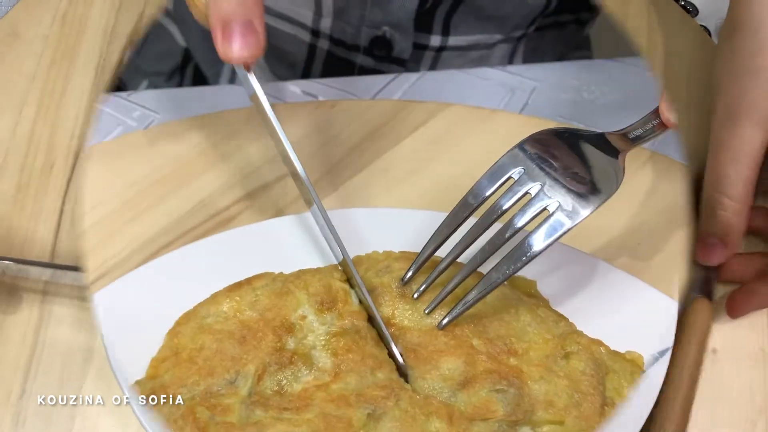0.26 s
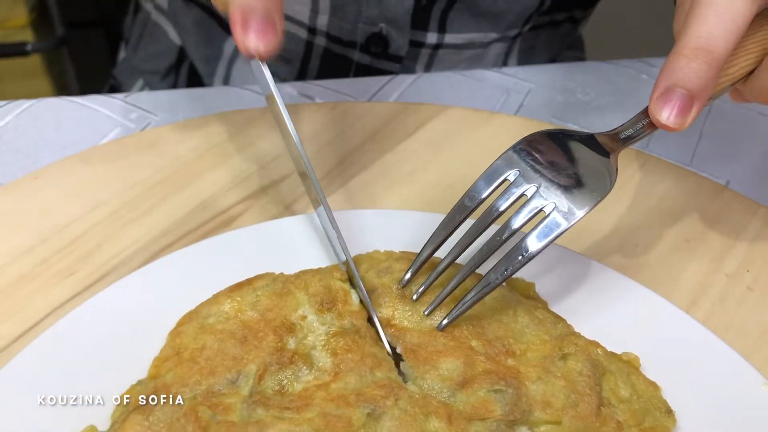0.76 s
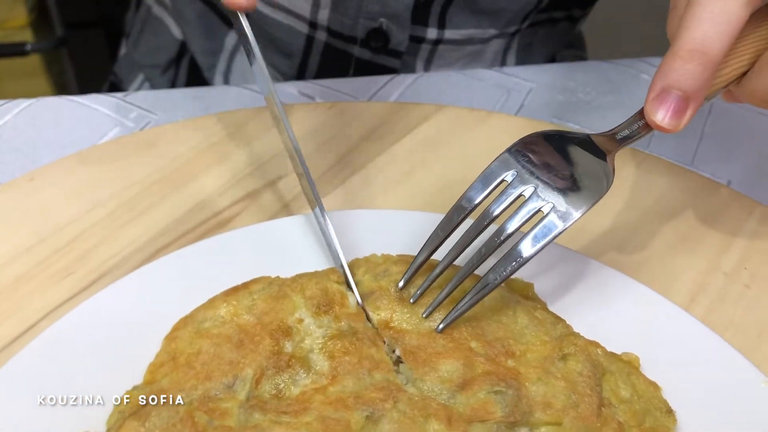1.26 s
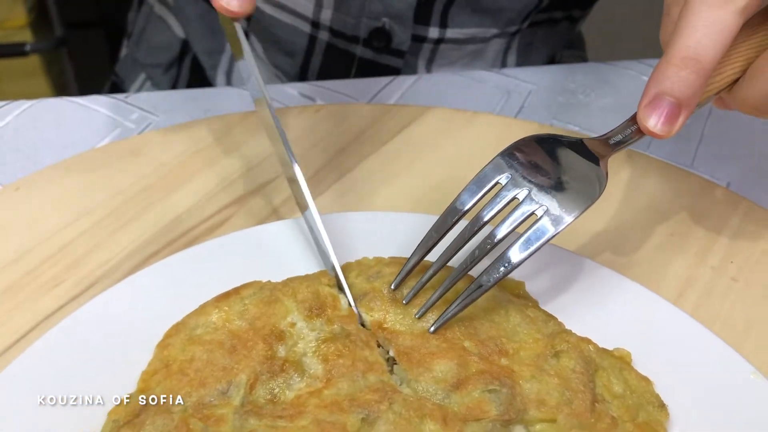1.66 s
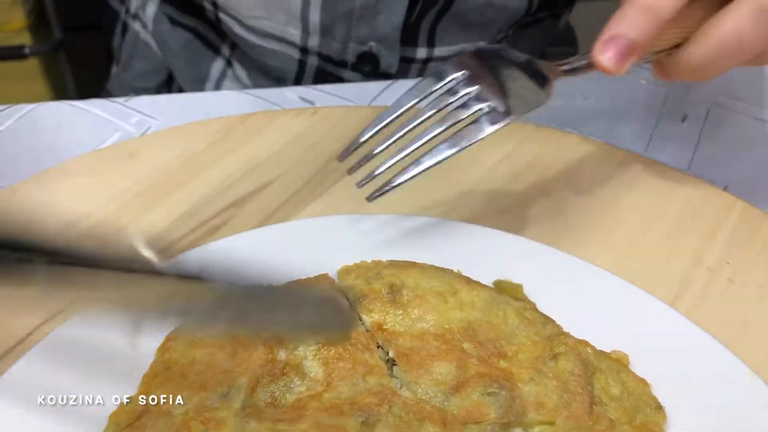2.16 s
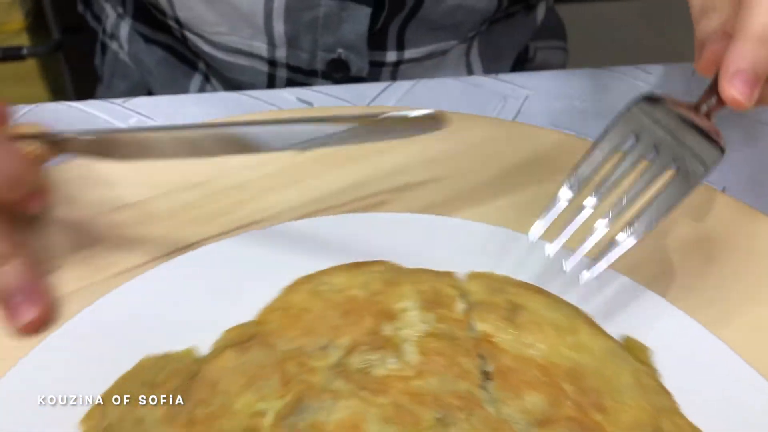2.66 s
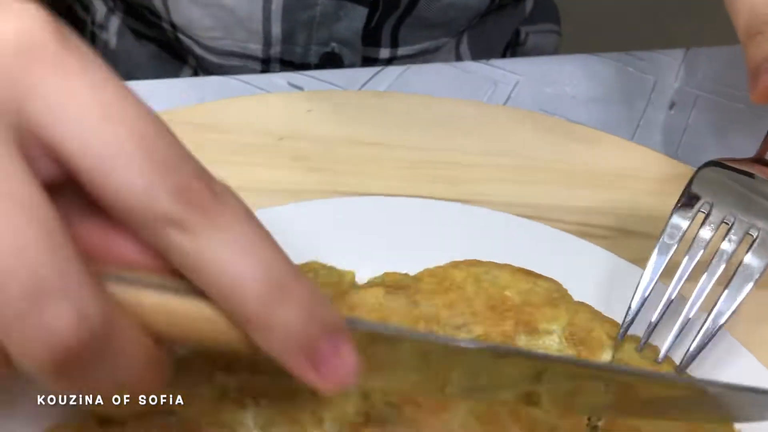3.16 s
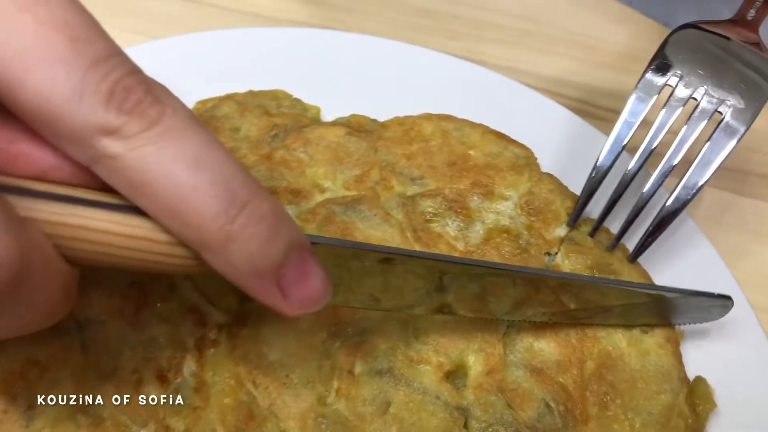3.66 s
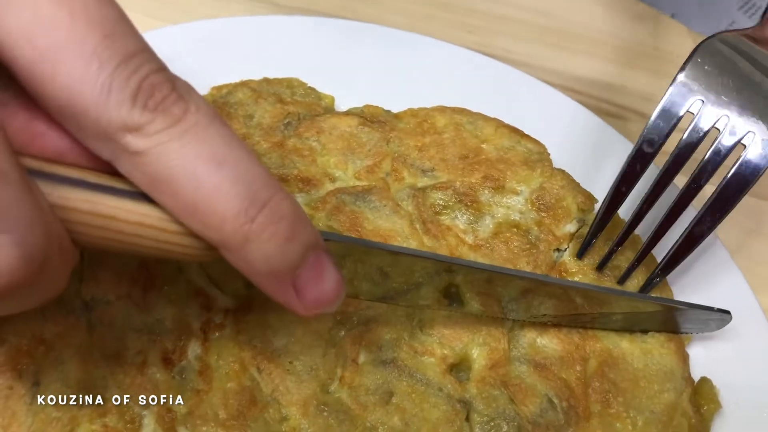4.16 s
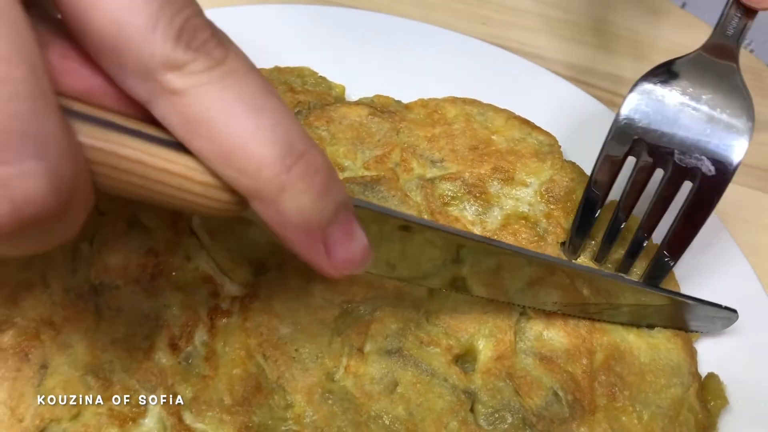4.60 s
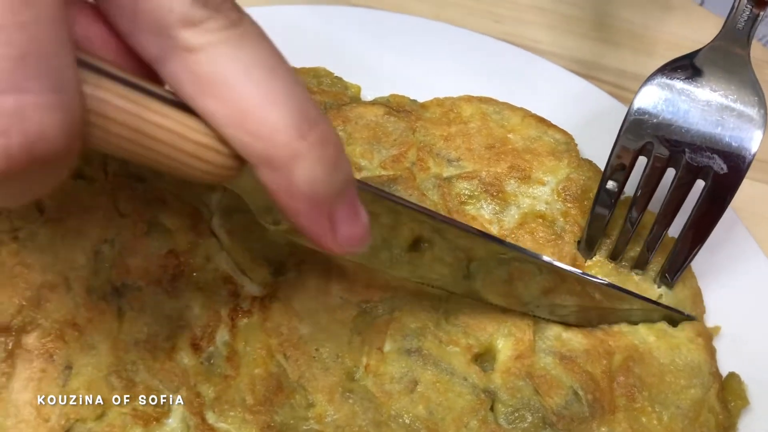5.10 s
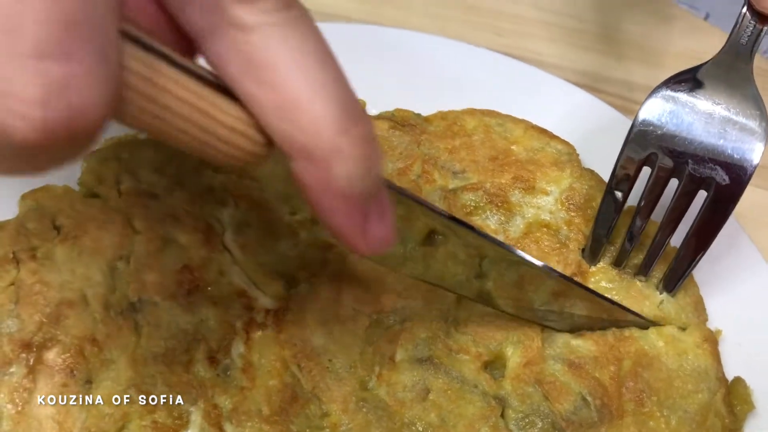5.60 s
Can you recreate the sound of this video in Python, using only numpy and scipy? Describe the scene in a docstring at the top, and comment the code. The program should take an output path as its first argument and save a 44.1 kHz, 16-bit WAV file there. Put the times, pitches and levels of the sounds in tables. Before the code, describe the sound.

Close to the microphone in a small kitchen, a knife tip saws through an omelette: gritty stick-slip scrapes each end in bright, short china clinks for nearly two seconds. A quiet gap follows with faint swishes. Then the flat edge presses down, with soft moist crackles, a hard plate knock, and smaller taps. Low room noise and a faint wavering hum lie underneath.

```python
"""In a small kitchen, close to the microphone, a steel knife cuts an omelette on a china plate on a wooden board.
First the upright tip saws: stick-slip scrapes and clinks ring the damped modes of plate and blade.
Then the edge is pressed down flat and knocks through: the same modes at another balance, over thumps of the board.
The moist egg crackles in random grains and pops; noise bands squeak, swish, rub and bump, and a faint tone rings.
A short room tail answers it all, over low room noise with a wavering hum."""
import sys
import numpy as np
from scipy import signal
from scipy.fft import rfft, irfft, next_fast_len
from scipy.io import wavfile
from scipy.ndimage import map_coordinates

SR = 44100
rng = np.random.default_rng(int(sys.argv[2]) if len(sys.argv) > 2 else 0)


def materialize(psi):
    """Save the field psi as 16-bit PCM at rate SR to the path in sys.argv[1].

    A 1-D psi becomes a single channel; in a 2-D psi each row is a channel.
    """
    bounded = np.clip(np.atleast_2d(psi).T, -1, 1)
    quanta = np.round(bounded * 32767).astype(np.int16)
    wavfile.write(sys.argv[1], SR, quanta)


N = 257544  # samples
GRIP_CHANGE_S = 3.0  # the knife is turned from its tip onto its edge


def amp(db):
    """Turn decibels into a gain."""
    return 10 ** (np.asarray(db) / 20)


def unit(x):
    """Scale a sound to rms 1."""
    return x / np.sqrt(np.mean(x ** 2) + 1e-20)


def seconds(length):
    """Time axis in seconds for a sound of the given length."""
    return np.arange(int(length * SR)) / SR


def along(points, hz):
    """Read a curve of (pitch_hz, value) points on a log frequency axis."""
    point_hz, value = np.transpose(points)
    return np.interp(np.log(hz + 1), np.log(point_hz), value)


def filtered(x, response):
    """Filter a sound with a gain that is a function of frequency."""
    size = next_fast_len(len(x) + 8192)
    spectrum = rfft(x, size) * response(np.fft.rfftfreq(size, 1 / SR))
    return irfft(spectrum, size)[:len(x)]


def coloured(x, spectrum):
    """Give a sound a (pitch_hz, level_db) colour, at rms 1."""
    return unit(filtered(x, lambda hz: amp(along(spectrum, hz))))


def wobble(rate):
    """A smooth random curve with the given number of knots a second."""
    knots = rng.standard_normal(int(N * rate / SR) + 4)
    return map_coordinates(knots, [np.arange(N) * rate / SR])


def add(track, s, sound):
    """Mix a sound into a track at time s."""
    part = track[max(round(s * SR), 0):][:len(sound)]
    part += sound[:len(part)]


def grains(rate, spread_db):
    """Random impulses of uneven size and either sign, on average rate a second, at rms 1."""
    hits = rng.random(N) < rate / SR
    sign = rng.choice([-1, 1], N)
    size = amp(spread_db * rng.uniform(-1, 1, N))
    return unit(hits * sign * size)


def at_level(x, db):
    """Scale a blow so that its first 10 ms have the given rms level."""
    return x * amp(db) / np.sqrt(np.mean(x[:SR // 100] ** 2))


# plate and blade ringing together, levels relative, decay before extra damping:
# pitch_hz, t60_s, tip_level_db, edge_level_db
CHINA_MODES = [(484, 0.075, -39.5, -38), (687.8, 0.09, -20.5, -18.5), (752.3, 0.065, -21.5, -18),
               (929.7, 0.04, -26.5, -17), (1012, 0.036, -24, -24), (1475, 0.052, -38, -40),
               (1935, 0.01, -18.5, -26), (2160, 0.016, -44, -25.5), (2298, 0.031, -21, -35),
               (2377, 0.31, -36, -45), (2600, 0.014, -18.5, -24.5), (2869, 0.025, -16, -31),
               (3415, 0.1, -32.5, -35), (3690, .035, -40.5, -24), (3566, .05, -29.5, -30),
               (3984, 0.046, -27.5, -31.5), (4522, 0.02, -18, -18.5), (4690, 0.066, -36.5, -19.5),
               (4650, 0.37, -56.5, -47), (5350, 0.064, -42.5, -43.5), (5955, 0.072, -37, -42),
               (6250, 0.02, -43.5, -21.5), (6547, 0.031, -31.5, -41.5), (7552, 0.021, -29.5, -34.5),
               (8470, 0.026, -32, -27.5), (9220, 0.12, -54, -32), (10123, 0.034, -36, -34),
               (10470, 0.063, -40, -42), (11200, 0.1, -52.5, -37), (12550, 0.034, -42.5, -36.5),
               (13030, 0.05, -61.5, -29.5), (14800, .08, -52.5, -47.5), (15290, 0.099, -56, -39.5)]
# borders between the registers knock, ring, bright and sheen: pitch_hz
REGISTER_BORDERS = [1300, 3200, 7000]


def china(s, damping, vary_db, build):
    """One decaying sine a row after a touch at time s, damped by extra dB/s; low modes take more cycles to build."""
    hz, t60, tip_db, edge_db = np.transpose(CHINA_MODES)[:, :, None]
    t = seconds(.3 if damping < 400 else .1)
    grip_db = tip_db if s < GRIP_CHANGE_S else edge_db
    level = grip_db + vary_db * rng.standard_normal(hz.shape)
    build_cycles = build * np.where(hz < REGISTER_BORDERS[0], 1, .5)
    swell = 1 - np.exp(-t * hz / build_cycles)
    tone = np.sin(2 * np.pi * (hz * t + rng.random(hz.shape)))
    return amp(level - (60 / t60 + damping) * t) * swell * tone


# ring, bright and sheen against the force: tip_level_db, edge_level_db, growth_db_per_db
TREBLE_BALANCE = [(0.5, -3, -0.08), (-3, -1, 0.11), (-10.5, -10.5, 0.67)]
FULL_BLOW_DB = -24  # a blow of full force


def register_levels(s, knock_db, hardness_db):
    """Levels of the four registers: a hard contact feeds the treble, a forceful one reaches highest."""
    tip_db, edge_db, growth = np.transpose(TREBLE_BALANCE)
    force_db = knock_db + hardness_db
    grip_db = tip_db if s < GRIP_CHANGE_S else edge_db
    treble_db = force_db + grip_db + growth * (force_db - FULL_BLOW_DB)
    return [knock_db, *treble_db]


# blade meets plate: start_s, knock_db,
# hardness_db (high for bare steel on glaze, low when the egg cushions the blow)
BLADE_CLINKS = [(0.1155, -41, -8), (0.129, -48.5, -20), (0.47, -37.5, -3.5), (0.514, -67, 13),
                (0.5415, -33, -7), (0.551, -38, -19), (0.566, -42, -15), (0.7045, -38.5, 1.5),
                (0.727, -51.5, 5.5), (0.732, -50, 5), (0.87, -55.5, -31), (0.955, -58, -5.5),
                (0.9879, -29, -1), (1.2023, -51.5, 17), (1.2125, -23.5, 0.5), (1.4071, -25, -0.5),
                (1.4322, -29, -10), (1.5645, -39.5, -12), (1.594, -45, -0.5), (1.6041, -26.5, 1),
                (1.845, -50, -24), (2.651, -56, -28), (2.753, -56.5, -32), (2.774, -58.5, -30),
                (3.729, -60.5, -17), (4.361, -53.5, -3.5), (4.479, -63, -4), (4.665, -21, -1),
                (5.051, -50.5, -4.5), (5.082, -37, -14), (5.329, -58, -22), (5.51, -53, -27),
                (5.5525, -53, -4.5), (5.5903, -29, -7), (5.805, -53, -18)]
# colour of the short crack: pitch_hz, level_db (per Hz, relative)
CRACK_COLOUR = [(150, -23.5), (600, -3.5), (1000, -8.5), (1250, -14.5), (1650, -12.5), (2500, 11),
                (3000, -4), (3800, -10.5), (4500, -6.5), (5300, -12.5), (6500, -16), (12000, -22),
                (16000, -21.5)]
# colour of the wooden board's thump: pitch_hz, level_db (per Hz, relative)
BOARD_COLOUR = [(25, -29), (55, 0), (150, -0.5), (330, -1.5), (600, -6.5), (1500, -49)]


def clinks(held, free_db, crack_db, crack_t60, graze_db, board_db, board_t60):
    """Each contact grazes the glaze, rings the modes with a short crack and thumps the board."""
    ringing, crack, thump = np.zeros((3, N))
    register = np.digitize(np.transpose(CHINA_MODES)[0], REGISTER_BORDERS)
    t, lead = seconds(.2), seconds(.008)
    contact = 1 - np.exp(-t / 0.00017)
    for s, knock, hardness in BLADE_CLINKS:
        levels = register_levels(s, knock, hardness)
        ring = levels[1]
        # after a light touch the blade stays on the glaze and damps it; a hard blow bounces free
        damping = held * np.clip((free_db - ring) / 14, 0, 1)
        modes = china(s, damping, vary_db=3.0, build=2.3)
        for k, db in enumerate(levels):
            add(ringing, s, at_level(modes[register == k].sum(0), db))
        # the graze swells up to the moment of contact
        add(crack, s - lead[-1], amp(ring + graze_db) * lead / lead[-1])
        add(crack, s, contact * amp(ring + crack_db - 60 * t / crack_t60))
        add(thump, s, contact * amp(knock + board_db - 60 * t / board_t60))
    crack_noise = crack * coloured(rng.standard_normal(N), CRACK_COLOUR)
    thump_noise = thump * coloured(rng.standard_normal(N), BOARD_COLOUR)
    return ringing + crack_noise + thump_noise


# the blade drags on the glaze: start_s, end_s, end_level_db
BLADE_SCRAPES = [(0.069, 0.123, -57), (0.505, 0.557, -40), (0.676, 0.739, -44), (0.995, 1.066, -41),
                 (1.148, 1.216, -41), (1.33, 1.414, -44.5), (1.547, 1.618, -45), (1.781, 1.85, -53.5),
                 (4.297, 4.365, -63), (5.05, 5.085, -58), (5.552, 5.596, -57.5), (5.773, 5.831, -61.5)]
# colour of the dry rasp: pitch_hz, level_db (per Hz, relative)
GRIT_COLOUR = [(300, -20), (1000, 4), (3000, -2), (4600, -6.5), (5600, -15.5), (10000, -21), (16000, -28.5)]
SCRAPE_SWELL_DB = 9  # every stroke grows by this much as the hand leans in


def scrapes(tilt_db, damping, clump_db, grit_db=-6):
    """The serrations stick and slip: clumps of tiny blows into the same modes, damped by the pressing blade."""
    out = np.zeros(N)
    slips = grains(rate=730, spread_db=4.5) * amp(clump_db * wobble(110))
    for start, end, db in BLADE_SCRAPES:
        count = max(int((end - start) * SR), 256)
        drag = slips[int(start * SR):][:count]
        modes = china(start, damping, vary_db=7.5, build=1).sum(0)
        body = filtered(modes, lambda hz: amp(tilt_db * np.log2(1 + hz / 1000)))
        force = amp(np.linspace(db - SCRAPE_SWELL_DB, db, len(drag)))
        add(out, start, signal.fftconvolve(unit(drag) * force, body / np.linalg.norm(body)))
        # the dry rasp of the contact itself
        add(out, start, coloured(drag, GRIT_COLOUR) * force * amp(grit_db))
    return out


# colour of the moist egg: pitch_hz, level_db (per Hz, relative)
EGG_COLOUR = [(710, -34.5), (1200, -2), (1370, -7.5), (1570, 0.5), (1870, -12.5), (2040, -8.5), (5020, -5),
              (16000, -11.5)]
# moist pops in the egg: start_s, level_db (before the common pop_db trim)
EGG_POPS = [(0.2024, -46.5), (0.2122, -47.5), (3.1627, -52), (3.3695, -47.5), (3.5493, -45.5),
            (3.6104, -45), (3.711, -43.5), (3.8621, -45.5), (4.2624, -45), (4.6126, -47.5), (5.7684, -47.5)]


def omelette(crackle_db, pop_db, pop_t60):
    """The moist egg tears in a fine crackle with a few distinct pops."""
    crackle = coloured(grains(rate=1400, spread_db=10.5), EGG_COLOUR)
    out = crackle * amp(tearing() + crackle_db)
    t = seconds(.02)
    for s, db in EGG_POPS:
        pop = coloured(rng.standard_normal(len(t)), EGG_COLOUR)
        add(out, s, pop * amp(db + pop_db - 60 * t / pop_t60))
    return out


# how steadily the egg is torn, first by the sawing tip, later under the edge:
# time_s, level_db (before the crackle_db trim)
STEADY_CUTTING = [(0, -87.5), (0.22, -78), (1.0, -78), (1.8, -83), (2.17, -80), (2.25, -89.5), (3.5, -86.5),
                  (5.15, -77), (5.7, -83)]
# single bursts of egg crackle, as the knife pushes in or is drawn out:
# peak_s, level_db (before the crackle_db trim)
CRACKLE_BURSTS = [(2.04, -74), (2.98, -75), (3.74, -66), (4.02, -75), (4.33, -67), (4.651, -62),
                  (4.936, -62.5), (5.06, -67.5), (5.418, -67), (5.57, -65), (5.8, -67.5)]
BURST_RISE_DB_PER_S, BURST_FALL_DB_PER_S = 273.5, 143


def tearing():
    """Crackle level in dB: steady cutting, with a quick swell and a slower fade for each burst."""
    t = np.arange(N) / SR
    loudest = np.interp(t, *np.transpose(STEADY_CUTTING))
    for s, db in CRACKLE_BURSTS:
        drop = np.maximum(BURST_RISE_DB_PER_S * (s - t), BURST_FALL_DB_PER_S * (t - s))
        loudest = np.maximum(loudest, db - drop)
    return loudest


# slide squeaks, swishes, hisses and one sharp moist tap, as noise bands:
# start_s, rise_s, t60_s, centre_hz, width_octaves, level_db
SLIDES_AND_TAP = [(0.159, 0.042, 0.86, 1560, 0.29, -67.5), (.18, 0.091, 0.24, 1016, 0.068, -61.5),
                  (1.931, 0.067, 0.74, 7040, 0.55, -78), (2.83, 0.013, .15, 3690, 0.76, -70.5),
                  (3.551, 0.00067, 0.094, 1583, 0.92, -53), (4.169, 0.0014, 0.26, 7860, .3, -64.5)]
# the egg rubs on the plate: start_s, level_db
EGG_RUBS = [(3.98, -66.5), (4.29, -58), (4.92, -61)]
# every rub: rise_s, t60_s, centre_hz, width_octaves
EGG_RUB_SHAPE = (0.0265, .34, 710, 0.092)
# a hand bumps the board: start_s, level_db
BOARD_BUMPS = [(0.559, -59), (1.038, -55.5), (3.23, -57.5), (3.508, -53)]
# every bump: rise_s, t60_s, centre_hz, width_octaves
BOARD_BUMP_SHAPE = (.02, .2, 72, 1.2)


def handling():
    """Slides, a moist tap, rubs and bumps: noise bands that rise evenly and die away."""
    out, t = np.zeros(N), seconds(0.31)
    rubs = [(s, *EGG_RUB_SHAPE, db) for s, db in EGG_RUBS]
    bumps = [(s, *BOARD_BUMP_SHAPE, db) for s, db in BOARD_BUMPS]
    for s, rise, t60, centre, width, db in [*SLIDES_AND_TAP, *rubs, *bumps]:
        noise = rng.standard_normal(len(t))
        band = filtered(noise, lambda hz: np.exp(-.5 * (np.log2((hz + 1) / centre) / width) ** 2))
        fade = amp(db - 60 * np.maximum(t - rise, 0) / t60)
        add(out, s, unit(band) * np.minimum(t / rise, 1) * fade)
    return out


# one faint tone: start_s, pitch_hz, level_db, t60_s
THIN_TONE = (5.728, 1620, -65, 1.4)


def thin_ring():
    """A faint thin tone rings during the last cut: one decaying sine with a soft onset."""
    start, hz, db, t60 = THIN_TONE
    out, t = np.zeros(N), seconds(.5)
    onset = 1 - np.exp(-t / 0.0026)
    add(out, start, np.sin(2 * np.pi * hz * t) * onset * amp(db - 60 * t / t60))
    return out


# decay of the room: pitch_hz, t60_s
KITCHEN_DECAY = [(150, .35), (800, .36), (2500, 0.38), (6000, 0.24), (14000, 0.26)]
# what the walls send back: pitch_hz, level_db (relative)
WALL_COLOUR = [(200, 1), (700, -3), (1200, -1), (2500, -5), (6000, -2), (14000, -5)]


def kitchen(x):
    """The walls answer with a short tail of decaying noise, different for each third of a second."""
    out, step = np.zeros(N), SR // 3
    for i in range(0, N, step):
        hz, t, z = signal.stft(rng.standard_normal(SR // 2), SR, nperseg=256)
        decay = amp(-60 * t / along(KITCHEN_DECAY, hz)[:, None])
        tail = signal.istft(z * decay, SR, nperseg=256)[1]
        tail = tail * np.minimum(np.arange(len(tail)) / SR / 0.0064, 1)  # fades in over 6.4 ms
        add(out, i / SR, signal.fftconvolve(x[i:i + step], tail / np.linalg.norm(tail)))
    return filtered(out, lambda hz: amp(along(WALL_COLOUR, hz)))


# colour of the room noise: pitch_hz, level_db (per Hz, relative)
AIR_COLOUR = [(15, -44.5), (25, -9.5), (70, -8.5), (92, -7), (123, -5.5), (180, 0), (249, -12), (270, -9.5),
              (344, -10), (531, -19.5), (677, -17.5), (840, -24), (1230, -26), (1740, -29), (16000, -47.5)]
# partials of the hum: pitch_hz, level_db (before the waver and the hum_db trim)
HUM_TONES = [(96.9, -73), (177.6, -67.5), (242.2, -69.5)]


def background(air_db, hum_db, waver_db):
    """Low room noise, with hum tones that waver at random in level and phase."""
    t = np.arange(N) / SR
    hum = np.zeros(N)
    for hz, db in HUM_TONES:
        level = amp(db + waver_db * wobble(4.3))
        hum += level * unit(np.sin(2 * np.pi * hz * t + 0.78 * wobble(15)))
    air = coloured(rng.standard_normal(N), AIR_COLOUR)
    return amp(air_db) * air + amp(hum_db) * hum


def scene():
    """Everything on the plate and board sounds into the kitchen."""
    near = clinks(held=610, free_db=-22.0, crack_db=-3, crack_t60=.028,
                  graze_db=-17.0, board_db=-27.0, board_t60=0.096)
    near = near + scrapes(tilt_db=-5.0, damping=550, clump_db=3.0)
    near = near + omelette(crackle_db=1.0, pop_db=-12, pop_t60=0.026)
    near = near + handling() + thin_ring()
    room = amp(-13.5) * kitchen(near)
    return (near + room + background(air_db=-62, hum_db=-4, waver_db=5.0))[None]


LOW_HZ, TOP_HZ = 33, 16300  # microphone bass limit and band limit


def record(dry):
    """The microphone drops the deepest bass and keeps nothing above its band limit."""
    def response(hz):
        """Steep bass roll-off and a sharp upper limit."""
        return (hz < TOP_HZ) * (1 - 1 / (1 + (hz / LOW_HZ) ** 6))
    return np.array([filtered(x, response) for x in dry])


dry = scene()
out = record(dry)
materialize(out)
```